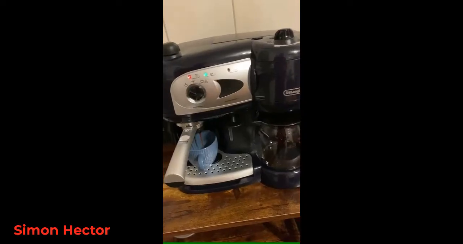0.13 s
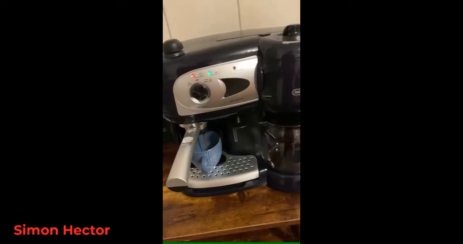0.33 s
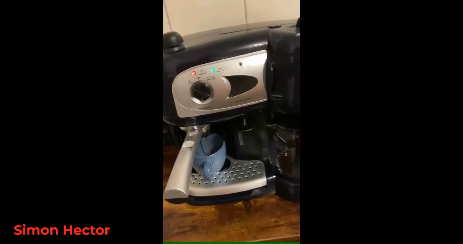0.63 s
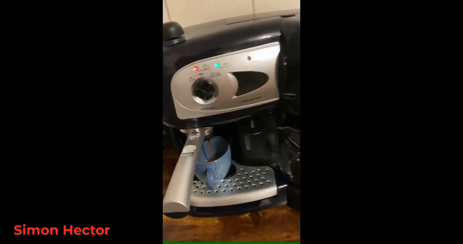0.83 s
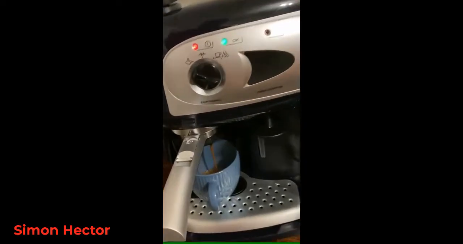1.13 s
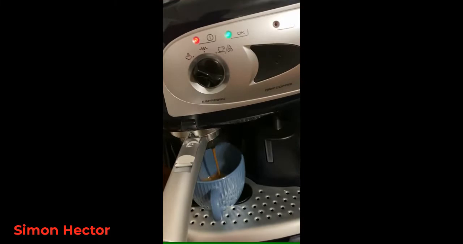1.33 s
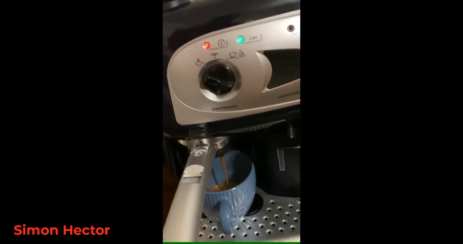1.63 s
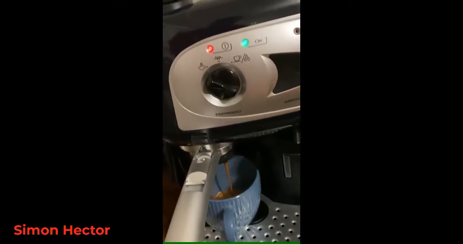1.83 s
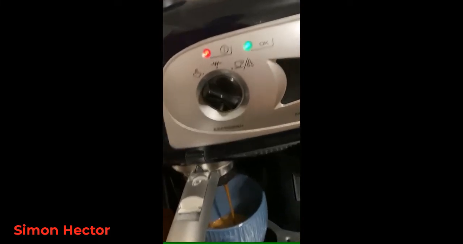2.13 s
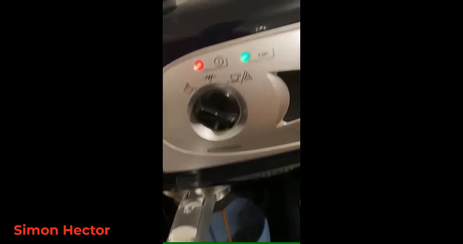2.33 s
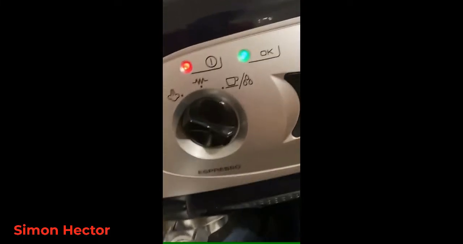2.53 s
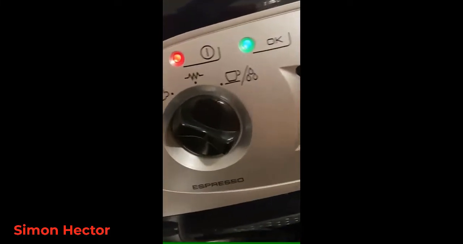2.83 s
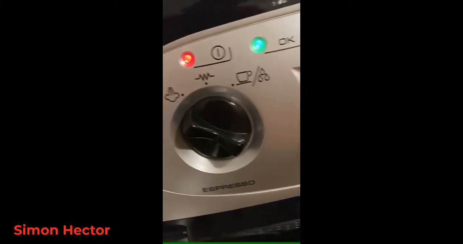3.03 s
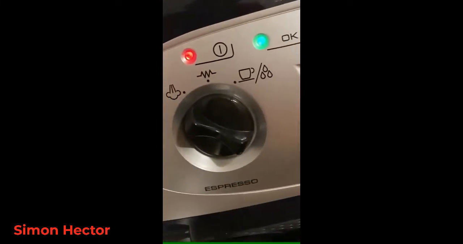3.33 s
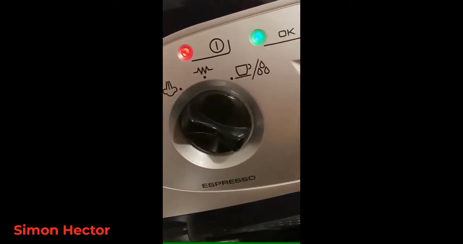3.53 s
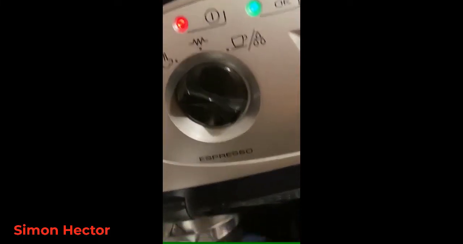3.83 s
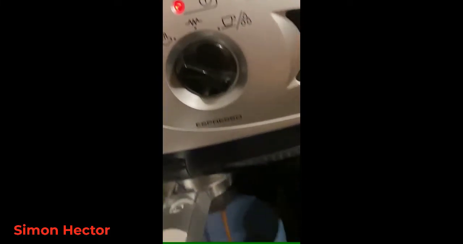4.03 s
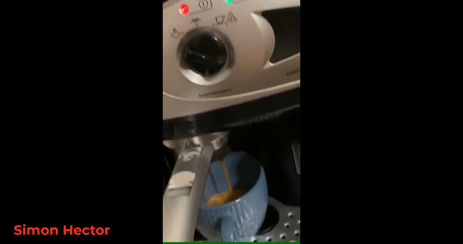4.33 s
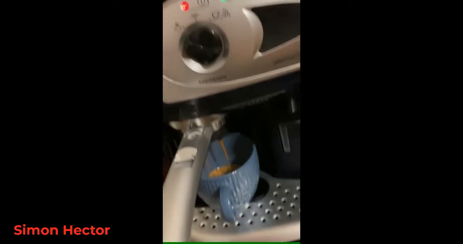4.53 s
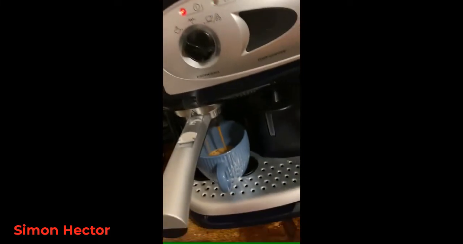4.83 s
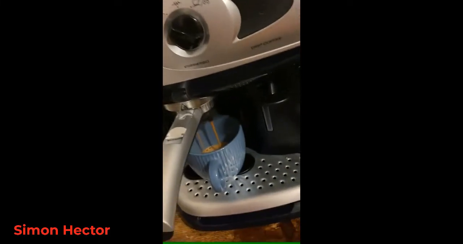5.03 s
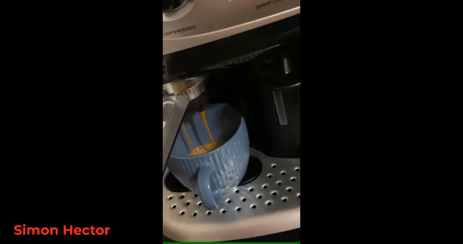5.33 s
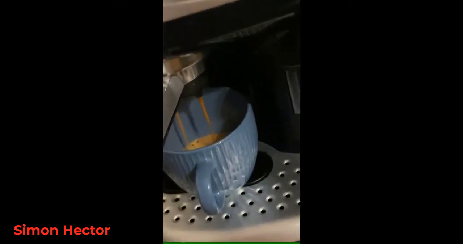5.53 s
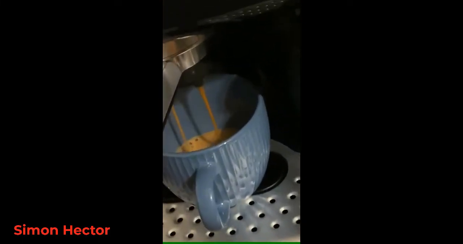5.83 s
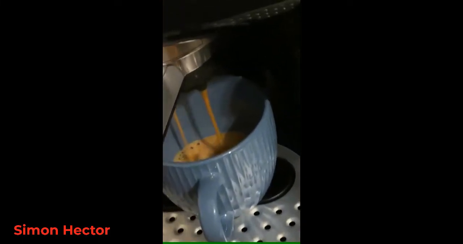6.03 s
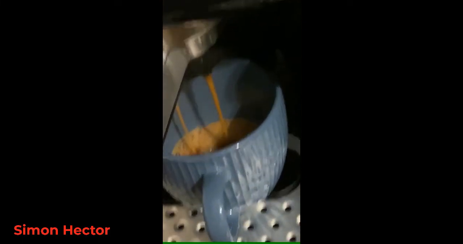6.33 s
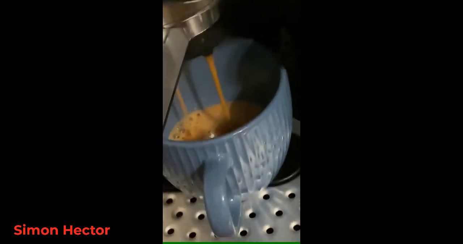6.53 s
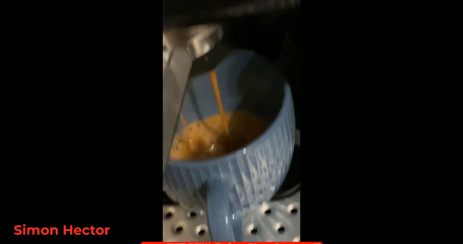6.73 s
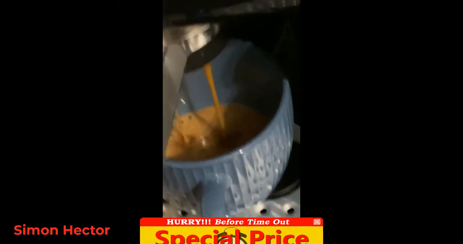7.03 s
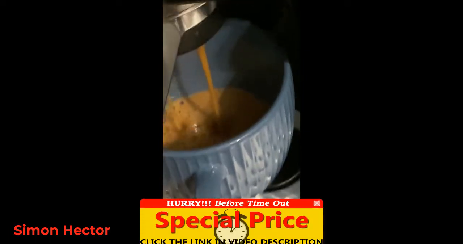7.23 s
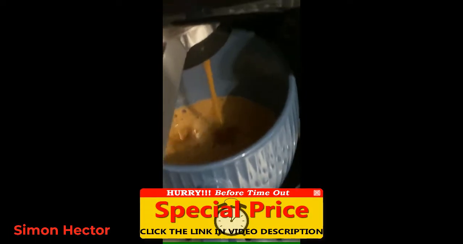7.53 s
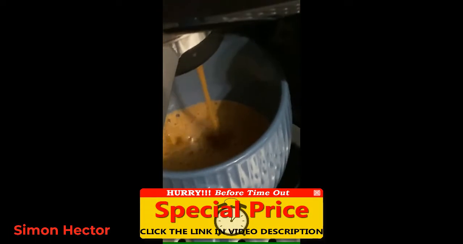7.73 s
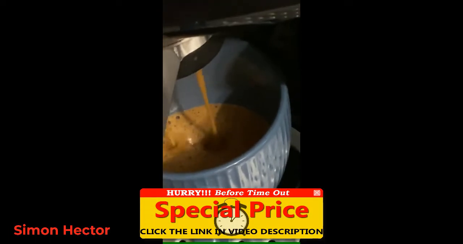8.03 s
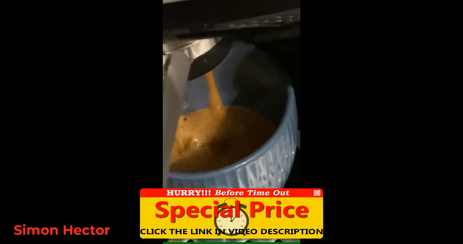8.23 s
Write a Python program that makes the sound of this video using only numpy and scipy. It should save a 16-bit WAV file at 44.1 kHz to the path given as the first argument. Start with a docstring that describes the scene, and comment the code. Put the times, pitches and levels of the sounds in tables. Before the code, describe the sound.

In a kitchen, a small espresso machine's vibrating pump runs without pause: a low hum strongest around 150 Hz, with a raspy metal rattle shaking fifty times a second. The handheld microphone moves from a little way off to very near, so hum and panel buzz grow slightly fuller. A cup knocks dully on the metal tray, mostly from the middle on, with a few thin china ticks.

```python
"""Small espresso machine, approached

A vibrating pump on 50 Hz mains drives a small espresso machine in a kitchen, heard ever closer.
The case hums in sines on multiples of the mains; each stroke shakes a rattle of shaped noise out of
the metal parts, and panels ring with it. The cup knocks and ticks on the drip tray in short decaying
tones, over a drone of filtered noise; the walls return a smeared share, unlike at the two ports."""
import sys
import numpy as np
from scipy import signal
from scipy.fft import rfft, irfft
from scipy.io import wavfile
from scipy.ndimage import uniform_filter1d

SR = 44100
rng = np.random.default_rng(int(sys.argv[2]) if len(sys.argv) > 2 else 0)


def unload_audio(sound):
    """Save the sound as a 16-bit wav file, at the path given as the first command line argument."""
    columns = np.transpose(np.atleast_2d(sound))
    # keep every value between -1 and 1, then stretch to whole-number steps
    steps = np.round(np.clip(columns, -1, 1) * 32767)
    wavfile.write(sys.argv[1], SR, steps.astype(np.int16))


N = 369999

MAINS_HZ, FIRST_STROKE_S = 50.008, .0037
TIME = np.arange(N) / SR
TURNS = (TIME - FIRST_STROKE_S) * MAINS_HZ  # mains cycles, one stroke each
BINS = np.fft.rfftfreq(N + 1, 1 / SR)  # Hz
SLOW = np.arange(0, N + 441, 441) / SR  # a hundred moments a second, for slow curves

# The walk up to the machine. Each row: time in seconds, closeness (-1 turned away, 0 afar, 1 close by),
# rattle level in dB.
APPROACH = [(0, -0.69, -49.5), (.6, -0.52, -50.5), (1.1, -.2, -48), (2, -0.12, -48), (2.7, 0.07, -47.5),
            (3.4, -0.001, -49), (4, 0.093, -47.5), (4.7, .2, -48.5), (5.3, 0.34, -49.5), (5.8, .5, -48),
            (6.3, 0.73, -46.5), (6.9, 0.86, -47), (7.5, 0.95, -48.5), (8.4, 0.97, -47)]


def gain_of(db):
    """dB to gain."""
    return 10 ** (np.asarray(db) / 20)


def evened(x):
    """Scales to rms 1."""
    return x / np.sqrt(np.mean(x ** 2) + 1e-20)


def curve(rows, axis):
    """One column of a table over time, a hundred values a second."""
    return np.interp(SLOW, [row[0] for row in rows], [row[axis] for row in rows])


def full(slow):
    """From a hundred values a second to one a sample."""
    return np.interp(TIME, SLOW, slow)


def drift(top_hz, count):
    """Slow chance of rms 1, one row each: twelve sines at random rates below top_hz."""
    share, start = rng.random((2, count, 12, 1))
    return np.sin(2 * np.pi * (top_hz * share * SLOW + start)).sum(1) / np.sqrt(6)


def coloured(x, rows, axis=1):
    """Filters by one dB column of a table over frequency."""
    log_hz = np.log([row[0] for row in rows])
    db = np.interp(np.log(BINS + 1), log_hz, [row[axis] for row in rows])
    return irfft(rfft(x, N + 1) * gain_of(db), N + 1)[..., :N]


def ring(x, hz, width_hz):
    """A two-pole resonance; the wider it is, the sooner it dies."""
    r = np.exp(-np.pi * width_hz / SR)
    return signal.lfilter([1, 0, -1], [1, -2 * r * np.cos(2 * np.pi * hz / SR), r * r], x)


def heard(far_db, close_db, least=0):
    """Gain between the far and the close level; a least below 0 lets it go past the far level."""
    closeness = np.clip(curve(APPROACH, axis=1), least, 1)
    return gain_of(far_db + closeness * (close_db - far_db))


def lines(rows, level, waver_db, waver_rad, ahead_turns, start_rad):
    """Sines locked to the strokes, wavering slowly in level and phase, the strongest one least."""
    spread_rad = .16  # upper lines arrive spread over the stroke
    out, chance = 0, drift(1.5, count=2 * len(rows))
    for (multiple, far_db, close_db), level_drift, phase_drift in zip(rows, chance[::2], chance[1::2]):
        k = round(2 * multiple) / 2  # locked to the mains
        loose = min(abs(k - 3) / 4.4, 1) + 0.29  # the strongest line is the steadiest
        least = -1 if k < 4 else 0  # the deepest also feel the turn
        gain = level * heard(far_db, close_db, least) * gain_of(waver_db * loose * level_drift)
        phase = start_rad + spread_rad * max(k - 6, 0) ** 2 + full(waver_rad * loose * phase_drift)
        out = out + full(gain) * np.cos(2 * np.pi * k * (TURNS + ahead_turns) + phase)
    return np.sqrt(2) * out


def hum():
    """The case hums on whole multiples of the mains; unequal strokes add half multiples."""
    # Hum of the case. Each row: multiple of the mains (taken to the nearest half), level in dB rms from
    # afar, level in dB rms from close by.
    whole = [(1.007, -58.5, -51.5), (2, -47, -41.5), (3, -35.0, -29), (4, -47.5, -45.5), (5, -63, -61.5),
             (5.96, -58.5, -63), (7.03, -64.5, -62), (7.944, -65.5, -57), (9.06, -61, -84.5),
             (10.005, -64, -55.5), (10.89, -56, -60), (12.03, -64.5, -56.5), (13, -59.5, -60),
             (14, -66.5, -63.5), (15.025, -57, -57), (17.07, -74.5, -68), (18.1, -65.5, -65.5),
             (21.05, -71, -64), (25.01, -65.0, -59.5), (25.98, -65.5, -68), (29.24, -64.5, -65),
             (30.75, -73.5, -61.5), (36.77, -68.5, -63.5)]
    # Strong and weak strokes alternate and add lines halfway between. Each row: multiple of the mains,
    # level in dB from afar, level in dB from close by, both at a limp of 1.
    half = [(2.5, -52, -48), (3.5, -48.5, -52.5), (4.5, -87, -80), (5.5, -47.5, -47), (6.5, -84, -57.5),
            (7.5, -65.5, -62), (8.5, -63.5, -59.5), (13.5, -65.5, -56.5)]
    # How far odd strokes outdo even ones; it mostly holds, at times fades or swaps over.
    # Each row: time in seconds, alternation (1 usual, below 0 swapped).
    limping = [(0, 0.42), (.17, 0.2), (.33, 0.87), (.8, 0.59), (1.35, 1.17), (1.6, .6), (1.78, 0.057),
               (1.92, 0.025), (2.07, -1.1), (2.22, 0.3), (2.45, -0.23), (2.74, 1.2), (2.95, 0.54),
               (3.08, -0.7), (3.32, 1.27), (3.66, -0.13), (3.82, 0.9), (4.1, 1.17), (4.75, 0.96),
               (5.0, -0.091), (5.2, 0.84), (5.6, 0.96), (5.88, .5), (6.08, 0.82), (6.38, 0.6), (6.65, 1.02),
               (8.4, 0.75)]
    limp = curve(limping, axis=1) + 0.13 * drift(7, count=1)[0]  # with a flutter below 7 Hz
    steady = lines(whole, 1, waver_db=1.5, waver_rad=.3, ahead_turns=0, start_rad=-2.4)
    return steady + lines(half, limp, waver_db=1.1, waver_rad=0.66, ahead_turns=0.463, start_rad=-4.0)


def strokes(rise_s, fall_s, steady, spread_db, grit_db, alike):
    """Noise that swells and dies with each stroke over a steady part; strokes differ in force and moment."""
    turns = TURNS + .125  # the shaking runs ahead of the hum's count
    which = np.floor(turns).astype(int) + 1
    force, late = rng.standard_normal((which.max() + 1, 2)).T
    since_s = np.maximum((turns % 1) / MAINS_HZ - .0015 - 0.00068 * late[which], 0)
    swell = (1 - np.exp(-(since_s / rise_s) ** 2)) * np.exp(-since_s / fall_s)
    swell = swell * gain_of(spread_db * force[which])
    # parts chatter unevenly
    grit = gain_of(grit_db * evened(uniform_filter1d(rng.standard_normal(N), 24)))
    fresh = grit * rng.standard_normal(N)
    # a share of the shaking repeats from stroke to stroke and changes only slowly
    period = round(SR / MAINS_HZ)
    habit = uniform_filter1d(rng.standard_normal((which.max() + 1, period)), size=50, axis=0)
    habit = evened(habit[which, (turns % 1 * period).astype(int)])
    alike = np.clip(alike, 0, 1)
    return evened((steady + swell) * (np.sqrt(alike) * habit + np.sqrt(1 - alike) * fresh))


def rattle():
    """Broad chatter of loose metal, its colour shifting with distance, and panels ringing through it."""
    # Colour of the rattle. Each row: frequency in Hz, relative level in dB from afar, in dB from close by.
    colours = [(514, -7, -29), (930, -4, 4), (1840, -3.5, -3), (2500, -10, -4.5), (3200, -4, -1.5),
               (3860, -10, -6.5), (4340, -3.5, -5), (5260, -4, 0.5), (6400, -2, -1), (7200, -3, -3),
               (7800, 0, -2), (8500, -1, -2), (9140, -2, -2.5), (10000, -12.5, -14.5), (10600, -9.5, -10),
               (15600, -9, -9.5)]
    # Panels that ring with the strokes, each loudest as the microphone passes it. Each row: pitch in Hz,
    # relative width in Hz, resting level in dB, loudest moment in seconds, span of the passing in seconds,
    # extra level at that moment in dB.
    panels = [(344, 75, -67.5, 0.24, 0.93, 10), (561, 147, -59, 4.8, 0.37, 7.5),
              (752.3, 44, -61, 2.7, 1, 0), (1021, 105, -66, 6.4, 1.3, 9),
              (1284, 105, -64.5, 1.1, 0.66, 11.5), (1440, 130, -62, 3.4, 1.2, 4),
              (1520, 57, -70.5, 8, 0.74, 14.5), (1719, 54, -65, 0.84, 1.1, 8),
              (1837, 87, -67, 6.07, 0.94, 15), (2134, 79, -66, 7.1, 3.3, 5.5),
              (2602, 38, -69.5, 3.1, 2.2, 5.5), (2773, 54, -71.5, 4.5, 2.2, 6),
              (4676, 69, -67, 2.5, 0.9, 4.5), (4944, 220, -66, 8.1, 1, 9), (5370, 250, -65, 3.2, 0.65, 7.5),
              (5630, 440, -72, 7.7, 1.5, 13), (6394, 900, -70.5, 6.4, 0.68, 12),
              (8060, 160, -68.5, 0.55, 1, 7)]
    widen = 1.47  # each panel rings through two equal resonances, which narrows it
    chatter = strokes(rise_s=0.0023, fall_s=0.005, steady=0.16, spread_db=1.8, grit_db=1.64, alike=0.05)
    close = full(np.clip(curve(APPROACH, axis=1), -1, 1))
    far, near = coloured(chatter, colours, axis=1), coloured(chatter, colours, axis=2)
    out = full(gain_of(curve(APPROACH, axis=2))) * ((1 - close) * far + close * near) / far.std()
    blows = strokes(rise_s=0.00081, fall_s=0.0029, steady=0.17, spread_db=0.8, grit_db=1.6, alike=0.59)
    for hz, width, db, loudest_s, span_s, extra_db in panels:
        passing_db = extra_db * np.exp(-((SLOW - loudest_s) / span_s) ** 2)
        drive = blows if hz < 3500 else chatter  # large panels take the blow, small parts the chatter
        ringing = ring(ring(drive, hz, widen * width), hz, widen * width)
        out += full(gain_of(db + passing_db)) * evened(ringing)
    return out


def taps(rows, rise_s, t60, gain_db, click_db, middle_hz):
    """Short rings of two modes with a soft start, and a click of contact."""
    out, t = np.zeros(N + 3000), np.arange(3000) / SR
    clicks = rng.standard_normal((len(rows), 3000)) * gain_of(click_db - 60 * t / 0.023)
    shape = (1 - np.exp(-(t / rise_s) ** 2)) * gain_of(-60 * t / t60)
    shape = shape / shape.max()
    for (start_s, db, hz), click in zip(rows, clicks):
        partner_hz = 2 * middle_hz - hz  # the other mode lies across the middle
        tone = np.sin(2 * np.pi * hz * t) + 0.34 * np.sin(2 * np.pi * partner_hz * t)
        dull = uniform_filter1d(click, size=5)  # little above a few kHz
        at = round(start_s * SR)
        out[at:at + 3000] += gain_of(db + gain_db) * (shape * tone + dull)
    return out[:N]


def jiggles():
    """Rows of faint knocks by chance, each hundredth of a second a chance."""
    # More when the cup walks, and deeper as it fills. Each row: time in seconds, knocks per second,
    # middle pitch in Hz.
    walking = [(0, 4, 1370), (2.2, 6, 1370), (2.6, 18, 1410), (3.2, 8, 1390), (4, 22, 1330), (4.4, 4, 1310),
               (5.4, 8, 1100), (7, 22, 1030), (7.6, 6, 990), (8.4, 4, 970)]
    luck, moment = rng.random((len(SLOW), 2)).T
    force, tune = rng.standard_normal((len(SLOW), 2)).T
    step = SLOW[1]
    start_s = SLOW + step * moment
    db = -44 + 1.5 * force  # before the trim of the knocks
    hz = curve(walking, axis=2) * (1 + .05 * tune)
    happens = (luck < curve(walking, axis=1) * step) & (SLOW < TIME[-1] - step)
    return np.transpose([start_s, db, hz])[happens].tolist()


def cup_knocks():
    """The cup knocks on the tray: dull rings that die within hundredths of a second."""
    # Clear knocks. Each row: start in seconds, level in dB before the trim, pitch in Hz.
    knocks = [(1.987, -31.5, 1410), (2.478, -35, 1470), (2.9, -37.5, 1440), (3.231, -38, 1430),
              (3.505, -31.5, 1360), (3.683, -34, 1080), (3.703, -25.5, 1380), (3.72, -33, 1320),
              (3.766, -32.5, 1130), (3.783, -36, 1140), (3.883, -35.5, 1340), (3.915, -35, 1400),
              (4.094, -36, 1120), (4.699, -37.5, 1440), (5.241, -34, 1070), (5.476, -33.5, 1070),
              (5.497, -37, 1060), (6.115, -31.5, 1015), (6.292, -28.5, 1060), (6.383, -38, 1010),
              (6.432, -26, 1035), (6.527, -29, 980), (6.652, -35, 950), (6.826, -36.5, 1000),
              (7.111, -34, 999), (7.766, -33, 970), (7.784, -33.5, 990), (7.942, -37, 950)]
    return taps([*knocks, *jiggles()], rise_s=0.0011, t60=0.028, gain_db=-1.2, click_db=-7.5, middle_hz=1190)


def china_ticks():
    """Thin china ticks: higher and shorter rings, mostly click."""
    # Each row: start in seconds, level in dB before the trim, pitch in Hz.
    ticks = [(0.5711, -37, 3140), (0.7455, -38, 3210), (1.401, -30, 3090), (1.9869, -37, 2900),
             (2.3979, -35, 2600), (2.4768, -35, 3200), (2.6469, -38, 2600), (6.4313, -27, 3130),
             (7.7797, -34, 3100), (7.981, -31, 2980)]
    return taps(ticks, rise_s=0.00037, t60=0.021, gain_db=-8.5, click_db=7.9, middle_hz=2780)


def drone():
    """Low noise of case, water and kitchen, filtered to one colour and 1 dB stronger close by."""
    # Colour of the drone. Each row: frequency in Hz, relative level in dB per Hz.
    colour = [(25, -22), (50, 7), (75, -3), (160, 6), (240, -4.5), (400, -4.5), (700, -6), (850, -12),
              (1300, -10.5), (2300, -15.5), (4000, -22)]
    far_db = -48
    return full(heard(far_db, far_db + 1.0)) * evened(coloured(rng.standard_normal(N), colour))


def from_walls(direct):
    """Sound from the walls: the phases of a short noise tail smear the direct sound."""
    # Each row: frequency in Hz, level in dB relative to the direct sound.
    share = [(50, -60), (150, -109), (300, -33), (500, -33), (1400, -21), (2100, -19.5), (2700, -8.5),
             (3700, -50), (4500, -2.5), (5100, -25), (6000, -2), (7200, -25.5), (8600, -1.5), (10500, -10),
             (13500, -7)]
    tail = rfft(rng.standard_normal(N) * gain_of(-60 * TIME / 0.062), N + 1)
    smeared = irfft(rfft(direct, N + 1) * tail / abs(tail), N + 1)[:N]  # phases scrambled, colour kept
    return coloured(smeared, share)


def scene():
    """One direct sound for both ports, and a share from the walls with opposite sign at each."""
    direct = hum() + rattle() + cup_knocks() + china_ticks() + drone()
    walls = from_walls(direct)
    return np.array([direct + walls, direct - walls])


def record(dry):
    """The two microphone ports drift apart in phase in the treble; then the band limit."""
    # Each row: frequency in Hz, phase in radians by which the left port leads.
    ports = [(0, 0), (5200, .2), (6850, 2.95), (7600, 3.3), (9700, 6.15), (11500, 6.4), (13100, 9.2),
             (14000, 9.7), (15800, 12)]
    lead = np.interp(BINS, *np.transpose(ports)) * np.array([[.5], [-.5]])  # half to each port
    wet = irfft(rfft(dry, N + 1) * np.exp(1j * lead), N + 1)[:, :N]
    edge_hz = 15680
    lowpass = signal.firwin(1023, edge_hz, window=("kaiser", 9), fs=SR)
    return signal.oaconvolve(wet, lowpass[None], "same")


dry = scene()
out = record(dry)
unload_audio(out)
```